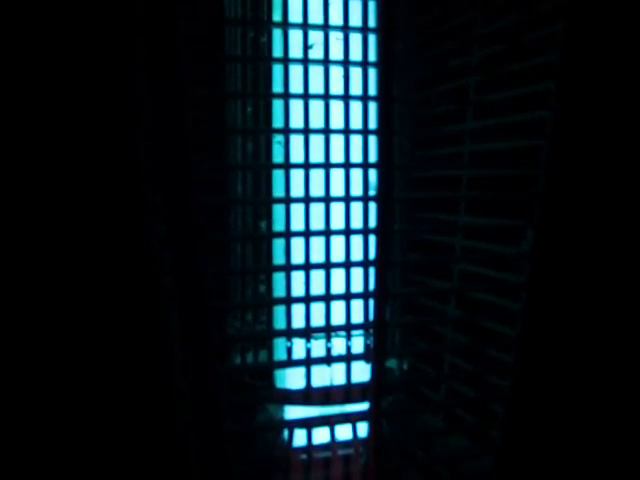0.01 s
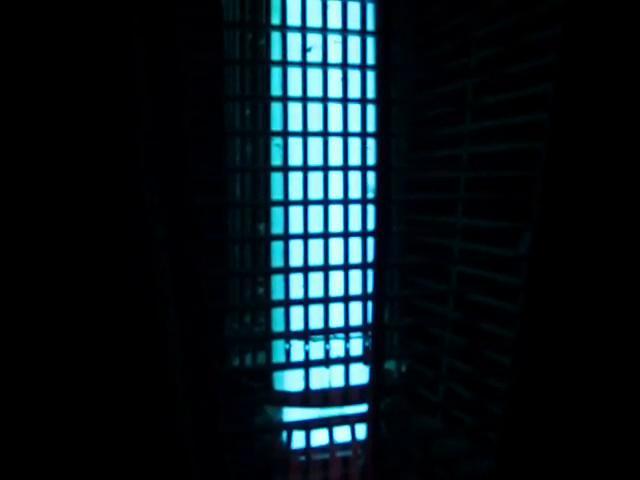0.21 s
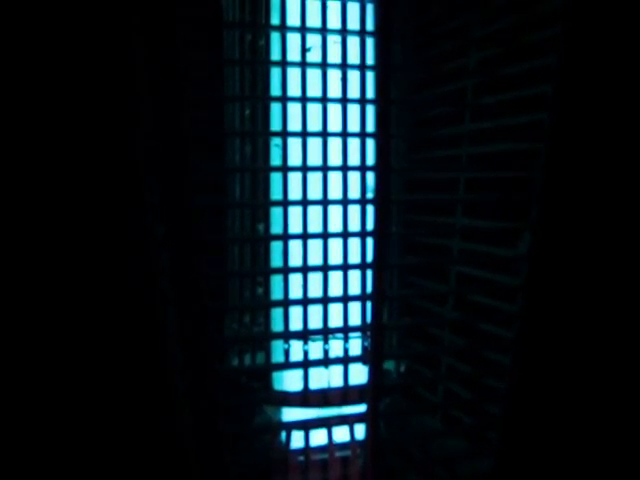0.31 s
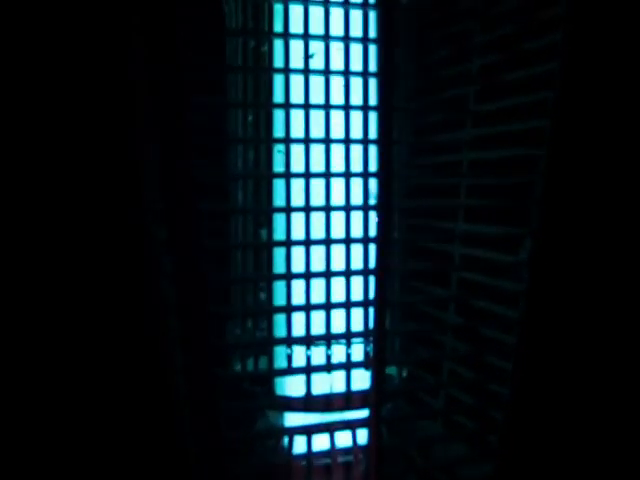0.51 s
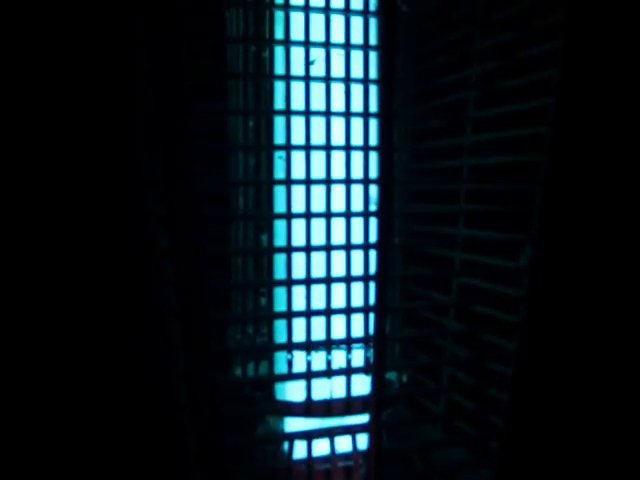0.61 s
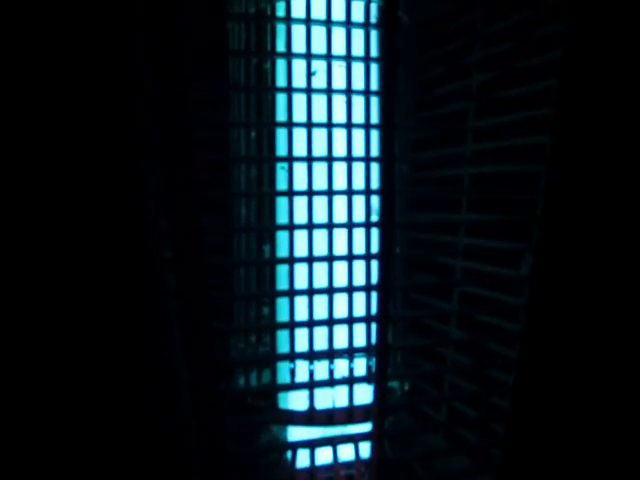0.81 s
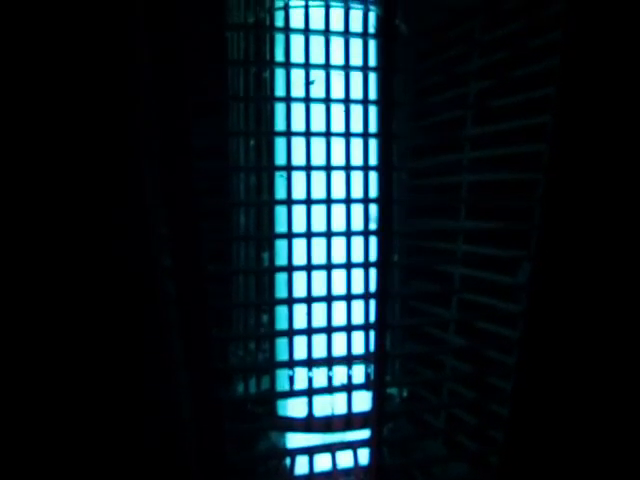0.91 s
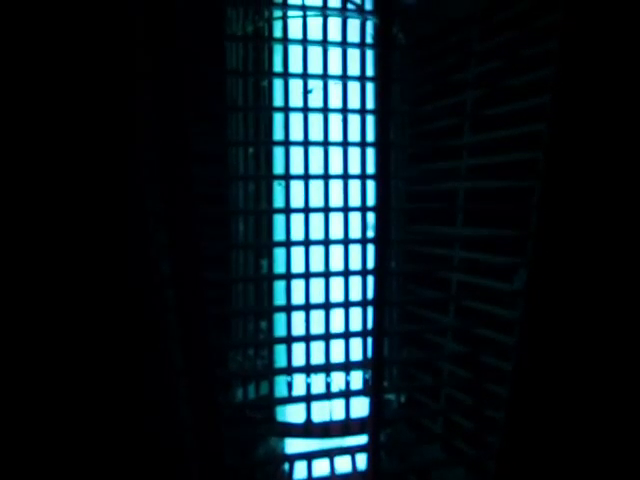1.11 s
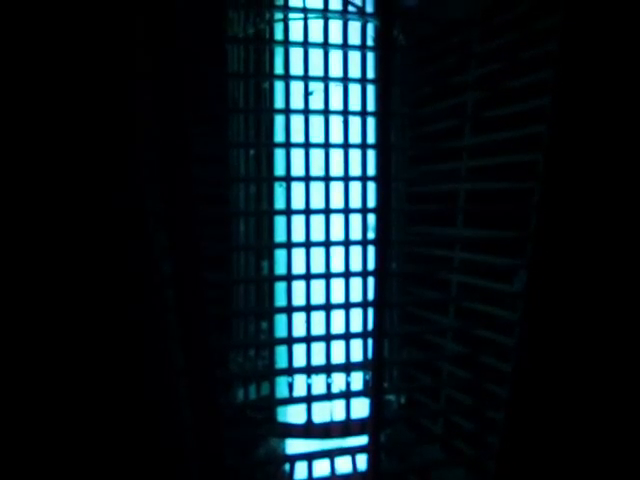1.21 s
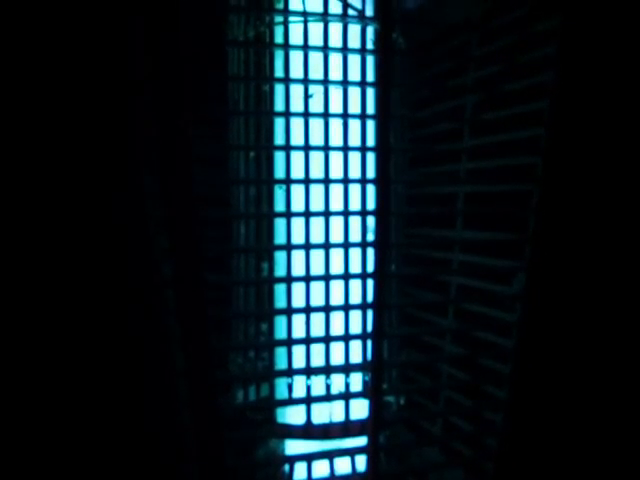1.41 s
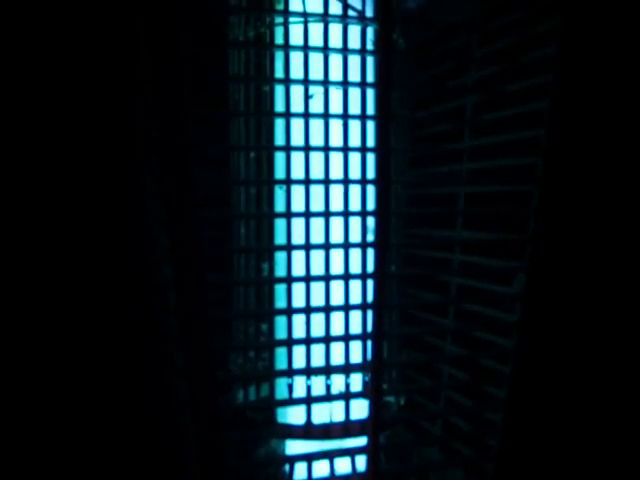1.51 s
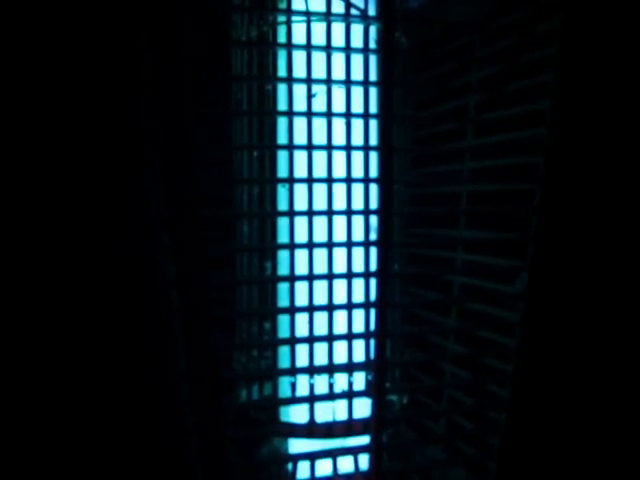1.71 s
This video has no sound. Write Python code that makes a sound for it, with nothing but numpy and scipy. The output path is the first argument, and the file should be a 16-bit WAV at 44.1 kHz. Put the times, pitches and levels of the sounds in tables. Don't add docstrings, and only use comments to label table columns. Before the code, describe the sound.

After a quiet quarter second of night air and faint chirps, sparks snap in a dense buzzing stream, pause, return, then crackle a third time more raggedly, bright, metallic and overloaded, ringing lightly around a yard.

```python
import sys
import numpy as np
from scipy import signal
from scipy.fft import rfft, irfft, next_fast_len
from scipy.io import wavfile
from scipy.ndimage import map_coordinates

SR = 44100
rng = np.random.default_rng(int(sys.argv[2]) if len(sys.argv) > 2 else 0)


def bounce(signal):
    frames = np.transpose(np.atleast_2d(signal))
    limited = np.clip(frames, -1, 1)
    pcm = np.round(limited * 32767).astype(np.int16)
    wavfile.write(sys.argv[1], SR, pcm)


def boost(x):
    u = np.asarray(x, float) / 20
    return 10 ** u


N = 79380

# pitch_hz, level_db
ANSWER_COLOUR = [(300, -8), (1500, -7), (3000, 0), (7000, 1.5), (12000, 0), (16500, 2.5), (18000, -3)]


def unit(x):
    return x / np.sqrt(np.mean(x ** 2) + 1e-20)


def along(points, hz):
    point_hz, values = np.transpose(points)
    return np.interp(np.log(hz + 1), np.log(point_hz + 1), values)


def filtered(x, response):
    n = x.shape[-1]
    padded = next_fast_len(n + 4096)
    gain = response(np.fft.rfftfreq(padded, 1 / SR))
    return irfft(rfft(x, padded) * gain, padded)[..., :n]


def hiss(shape, colour):
    return unit(filtered(rng.standard_normal(shape), lambda hz: boost(along(colour, hz))))


def band(centre_hz, width_hz):
    bell = lambda hz: np.exp(-((hz - centre_hz) / width_hz) ** 2)
    return unit(filtered(rng.standard_normal(N), bell))


def wobble(rate):
    knots = rng.standard_normal(int(N * rate / SR) + 4)
    return map_coordinates(knots, [np.arange(N) * rate / SR])


def place(times, rows):
    at = np.round(times * SR).astype(int)[:, None] + np.arange(rows.shape[1])
    return np.bincount(at.ravel(), rows.ravel(), N + rows.shape[1])[:N]


def wind_and_hum():
    # pitch_hz, level_db (per Hz)
    air_colour = [(8.8, -9.5), (15, 2.5), (348, -24), (983, -26.5), (1110, -29.5), (1580, -34),
                  (2260, -41.5), (16000, -53), (18000, -76)]
    level_db, gust_db = -39, 1.3
    return boost(level_db + gust_db * wobble(8.2)) * hiss(N, air_colour)


def crickets():
    flutter_db = 1.3 * wobble(25.2)
    low_band = boost(-65.5 + flutter_db) * band(2830, 100)
    katydids = boost(-74) * band(6200, 400)
    return low_band + katydids


def far_chirps():
    # start_s, length_s, pitch_hz, level_db
    calls = [
        (-.08, .24, 1600, -55),
        (.192, .05, 1020, -44),
        (.204, .08, 1460, -46),
        (.625, .055, 1090, -47),
        (1.07, .12, 1070, -51),
        (1.57, .05, 1450, -55),
    ]
    t = np.arange(N) / SR
    blur, width_hz = .45, 45
    total = np.zeros(N)
    for start_s, length_s, pitch_hz, level_db in calls:
        progress = np.clip((t - start_s) / length_s, 0, 1)
        swell = np.sqrt(np.sin(np.pi * progress) ** 2)
        voice = np.sin(2 * np.pi * pitch_hz * t) + blur * band(pitch_hz, width_hz)
        total += boost(level_db) * swell * voice
    return total


def spark_list():
    # start_s, level_db
    first_bug = [(0.2486, -17.4), (0.2556, -14.2), (0.2807, -12.6), (0.2896, -11.2), (0.2991, -8.0),
                 (0.3088, -8.0), (0.3168, -8.9), (0.3244, -9.1), (0.3322, -9.2), (0.3671, -13.5),
                 (0.3731, -12.8), (0.3772, -10.2), (0.3832, -8.2), (0.3913, -10.7), (0.3984, -12.7),
                 (0.4073, -9.2), (0.4155, -10.7), (0.4235, -12.3), (0.4313, -10.9), (0.4399, -10.7),
                 (0.4476, -11.3), (0.4512, -12.5), (0.4564, -12.0), (0.4596, -9.3), (0.4659, -11.0),
                 (0.4741, -10.5), (0.4766, -10.3), (0.4829, -8.3), (0.4855, -9.3), (0.4907, -7.2),
                 (0.4929, -11.0), (0.4993, -8.2), (0.5067, -9.1), (0.5224, -11.5), (0.5249, -14.8),
                 (0.5311, -10.1), (0.572, -14.1), (0.5734, -14.6), (0.5755, -12.2), (0.5822, -7.8),
                 (0.5908, -8.9), (0.5991, -5.5)]
    # start_s, level_db
    second_bug = [(0.6839, -12.4), (0.6911, -16.0), (0.6979, -13.0), (0.6998, -14.8), (0.7068, -8.1),
                  (0.7157, -10.1), (0.7253, -7.5), (0.7323, -10.7), (0.7405, -9.5), (0.7512, -13.5),
                  (0.7574, -10.9), (0.7599, -11.5), (0.7658, -10.4), (0.769, -9.7), (0.7751, -7.6),
                  (0.7833, -8.5), (0.7907, -9.1), (0.8001, -10.6), (0.8087, -8.8), (0.8173, -8.1),
                  (0.8244, -9.4), (0.831, -9.9), (0.834, -9.8), (0.8413, -7.9), (0.8495, -8.0),
                  (0.8576, -8.6), (0.8668, -8.9), (0.8755, -7.8), (0.8834, -11.4), (0.8913, -8.6),
                  (0.8985, -10.8), (0.9014, -10.5), (0.9067, -9.7), (0.9222, -12.0), (0.9247, -10.3),
                  (0.9317, -12.9), (0.9406, -11.7), (0.949, -12.5), (0.9733, -13.1), (0.9813, -10.9),
                  (0.9901, -9.0), (0.9977, -10.5)]
    # start_s, level_db
    third_bug = [(1.2081, -14.8), (1.2155, -10.8), (1.2311, -12.2), (1.283, -14.9), (1.2902, -10.2),
                 (1.2982, -15.7), (1.3011, -12.7), (1.308, -7.8), (1.3169, -10.0), (1.327, -9.6),
                 (1.3324, -9.2), (1.3404, -10.6), (1.3484, -11.5), (1.3655, -11.4), (1.3744, -14.6),
                 (1.3809, -12.6), (1.383, -11.1), (1.3916, -11.6), (1.3996, -9.5), (1.4067, -11.5),
                 (1.4146, -10.3), (1.4239, -10.4), (1.4326, -11.7), (1.4404, -9.5), (1.4485, -11.1),
                 (1.5158, -13.1), (1.5555, -12.8)]
    # start_s, level_db
    weak_arcs = [(.2731, -26), (.545, -31), (.549, -31), (.553, -31), (.5579, -30), (.561, -31),
                 (.5635, -27), (.566, -26), (.5685, -27), (.6885, -25), (.9607, -24), (1.549, -29)]
    start_s, level_db = np.transpose(first_bug + second_bug + third_bug + weak_arcs)
    typical_db, growth = -10, 0.23
    echo_db = np.minimum(level_db, typical_db + growth * (level_db - typical_db))
    return start_s, level_db, echo_db


def cracks(start_s, level_db):
    # pitch_hz, level_db
    crack_colour = [(300, -14), (1500, -3.5), (4000, -7), (7000, 2), (9500, -2.5), (12000, -2), (16500, -2),
                    (18000, -21)]
    t = np.arange(SR // 40) / SR
    shape = (len(start_s), len(t))
    rise = 1 - np.exp(-t / .00012)
    snap = rise * boost(2 - 60 * t / 0.0057)
    rattle = rise * boost(-3 - 60 * t / 0.015)
    crack = snap * hiss(shape, crack_colour) + rattle * hiss(shape, ANSWER_COLOUR)
    crack *= np.linalg.norm([snap, rattle]) / np.linalg.norm(crack, axis=1, keepdims=True)
    return place(start_s, boost(level_db)[:, None] * crack)


def wall_echo(start_s, echo_db):
    t = np.arange(SR // 40) / SR
    from_s, to_s, edge_s, fade_s = 0.0062, 0.015, 0.00063, .0018
    swell = 1 / (1 + np.exp((from_s - t) / edge_s * 2))
    fade = 1 / (1 + np.exp((t - to_s) / fade_s))
    burst = boost(-18.5) * swell * fade * hiss((len(start_s), len(t)), ANSWER_COLOUR)
    return place(start_s, boost(echo_db)[:, None] * burst)


def yard_echo(start_s, echo_db):
    # pitch_hz, decay_s
    yard_decay = [(500, 0.16), (3000, 0.33), (9000, 0.35), (17000, 0.24)]
    first_echo_s = 0.0062
    hz, frame_s, noise = signal.stft(hiss(N, ANSWER_COLOUR), SR, nperseg=128)
    decay_s = along(yard_decay, hz)[:, None]
    power = np.zeros(noise.shape)
    for start, level in zip(start_s, echo_db):
        age = frame_s - start
        tail = boost(2 * level - 120 * np.maximum(age, 0) / decay_s)
        power += tail * (age > first_echo_s)
    return boost(-32) * signal.istft(noise * np.sqrt(power), SR, nperseg=128)[1][:N]


def stuck():
    # start_s, length_ms, offset (share of full scale)
    sticks = [(0.2486, 7.03, 0.69), (0.309, 0.79, 0.66), (0.3247, 7.34, 0.66), (0.3835, 7.67, -0.46),
              (0.4512, 5.22, -0.67), (0.4598, 6.12, -0.71), (0.4771, 5.96, -0.54), (0.4857, 5.1, -0.52),
              (0.4908, 2.06, 0.53), (0.5249, 6.26, 0.58), (0.5824, 4.22, 0.13), (0.5916, 7.91, -0.64),
              (0.6005, 9.16, -0.15), (0.6912, 6.8, 0.77), (0.7256, 7.12, -0.35), (0.7755, 7.76, -0.37),
              (0.791, 3.2, -0.59),
              (0.8412, 8.49, -0.47), (0.8576, 5.8, 0.29), (0.8754, 0.91, 0.58), (0.8834, 3.06, -0.57),
            (0.9226, 2.2, -0.67), (0.9248, 6.87, 0.55), (1.2082, 1.0, 0.55), (1.3169, 7.69, 0.48),
            (1.3271, 5.83, 0.52), (1.3485, 17.0, -0.53), (1.3655, 5.24, -0.38), (1.3918, 1.95, -0.36),
            (1.4146, 2.2, 0.47), (1.4408, 7.85, 0.46), (1.4493, 13.63, 0.47), (1.516, 16.17, 0.54)]
    t = np.arange(N) / SR
    edge_s, sag_per_s = .03 / 1000, 1.5
    gate = lambda age: np.clip(age / edge_s, 0, 1)
    total = np.zeros(N)
    for start_s, length_ms, offset in sticks:
        age = t - start_s
        held = gate(age) * gate(start_s + length_ms / 1000 - t)
        total += offset * held * (1 - sag_per_s * age)
    return total


def thrown(x, dry):
    # start_s, length_ms (the sign gives the direction)
    first_throws = [(0.28066, -0.088), (0.28962, 0.085), (0.28977, 0.065), (0.28999, 0.043),
                    (0.29917, -0.051), (0.2994, -0.096), (0.30882, -0.096), (0.30895, 0.062),
                    (0.30916, -0.057), (0.30934, 0.111), (0.30949, 0.091), (0.30967, 0.102),
                    (0.31678, -0.065), (0.31702, -0.113), (0.32443, 0.057), (0.32455, 0.062),
                    (0.32467, -0.045), (0.32474, -0.085), (0.33215, -0.054), (0.33245, -0.048),
                    (0.36715, -0.074), (0.37311, -0.06), (0.37721, -0.085), (0.38323, -0.051),
                    (0.38338, 0.045), (0.39128, 0.085), (0.39143, -0.082), (0.40735, -0.136),
                    (0.40751, 0.082), (0.40776, 0.176), (0.44758, -0.113), (0.44793, -0.045),
                    (0.45643, 0.045), (0.45669, 0.054), (0.45955, 0.122), (0.46594, 0.145),
                    (0.47409, -0.062), (0.47661, -0.079), (0.47673, -0.071), (0.47704, 0.04),
                    (0.48567, -0.108), (0.49067, -0.108), (0.4908, 0.094), (0.49289, -0.057),
                    (0.49295, -0.054), (0.49303, -0.057), (0.49928, -0.218), (0.49954, -0.096),
                    (0.49991, 0.082), (0.50669, -0.091), (0.53113, -0.068), (0.53143, -0.045),
                    (0.57344, 0.065), (0.57554, 0.079), (0.59082, -0.082), (0.59144, 0.102),
                    (0.59918, 0.062), (0.59937, -0.099), (0.5995, 0.051), (0.59998, 0.048)]
    # start_s, length_ms (the sign gives the direction)
    second_throws = [(0.69985, -0.074), (0.70018, 0.065), (0.70676, -0.06), (0.70686, 0.173),
                     (0.71571, 0.128), (0.71594, -0.096), (0.72527, 0.119), (0.73234, -0.128),
                     (0.73248, -0.139), (0.73268, 0.116), (0.74045, 0.13), (0.74067, -0.105),
                     (0.75123, -0.094), (0.75741, 0.116), (0.7599, -0.079), (0.76584, -0.054),
                     (0.76608, -0.088), (0.76922, -0.096), (0.7751, 0.204), (0.77539, 0.068),
                     (0.77553, -0.113), (0.78325, 0.119), (0.78346, -0.091), (0.79075, 0.198),
                     (0.80874, -0.082), (0.80906, 0.071), (0.84132, -0.082), (0.85009, 0.082),
                     (0.85755, 0.19), (0.87546, 0.06), (0.87554, 0.099), (0.87566, 0.105), (0.8834, -0.108),
                     (0.89134, 0.119), (0.89159, -0.062), (0.89847, 0.122), (0.89868, -0.094),
                     (0.90141, -0.079), (0.90174, 0.071), (0.90669, -0.079), (0.90702, 0.077),
                     (0.92221, 0.079), (0.92482, 0.037), (0.92501, 0.153), (0.93173, -0.105),
                     (0.97339, -0.068), (0.98152, -0.04), (0.9901, 0.071), (0.99024, 0.111),
                     (0.99774, 0.082), (0.99808, -0.045)]
    # start_s, length_ms (the sign gives the direction)
    third_throws = [(1.21547, -0.088), (1.2156, -0.153), (1.21581, 0.065), (1.23109, -0.315),
                    (1.23145, 0.04), (1.28305, 0.074), (1.28339, -0.06), (1.29019, 0.06), (1.29037, 0.054),
                    (1.29048, 0.068), (1.30112, 0.082), (1.30796, -0.147), (1.30837, 0.057),
                    (1.30859, 0.15), (1.3169, 0.204), (1.32699, 0.085), (1.32713, 0.111), (1.33278, 0.13),
                    (1.34039, -0.082), (1.34072, 0.136), (1.34851, -0.105), (1.36548, 0.074),
                    (1.37446, 0.071), (1.38094, -0.051), (1.38305, 0.077), (1.39159, -0.057),
                    (1.39168, 0.071), (1.39188, -0.111), (1.40671, -0.077), (1.40737, -0.062),
                    (1.41463, 0.21), (1.42391, -0.099), (1.42409, 0.167), (1.42429, 0.06), (1.42454, 0.054),
                    (1.43257, 0.159), (1.44043, 0.06), (1.44051, -0.077), (1.44076, -0.057),
                    (1.44083, 0.096), (1.44854, -0.113), (1.44869, 0.102), (1.44887, -0.088),
                    (1.44921, 0.173), (1.51581, -0.079), (1.51601, 0.079), (1.55554, 0.082)]
    start_s, length_ms = np.transpose(first_throws + second_throws + third_throws)
    limit, edge_ms, ride = 1.03, .045, .4
    first_s = np.round(start_s * SR) / SR - 2 / SR
    age = (first_s - start_s)[:, None] + np.arange(SR // 400) / SR
    gate = lambda a: np.clip(a * 1000 / edge_ms + .5, 0, 1)
    held = gate(age) * gate(abs(length_ms)[:, None] / 1000 - age)
    pinned = limit * np.clip(place(first_s, np.sign(length_ms)[:, None] * held), -1, 1)
    share = np.minimum(place(first_s, held), 1)
    return (1 - share) * x + pinned + share * ride * dry


def scene():
    night = wind_and_hum() + crickets() + far_chirps()
    start_s, level_db, echo_db = spark_list()
    near = cracks(start_s, level_db) + wall_echo(start_s, echo_db)
    return (night + near + yard_echo(start_s, echo_db))[None]


def top_cut(x):
    return signal.sosfilt(signal.butter(12, 18540, fs=SR, output="sos"), x)


def record(dry):
    clip_level, top_hz, edge_hz = 2.5, 17450, 60
    overloaded = thrown(dry + stuck(), dry)
    clipped = np.clip(overloaded, -clip_level, clip_level)
    mix = filtered(clipped, lambda hz: (1 - np.tanh((hz - top_hz) / edge_hz)) / 2)
    return top_cut(mix)


dry = scene()
out = record(dry)
bounce(out)
```